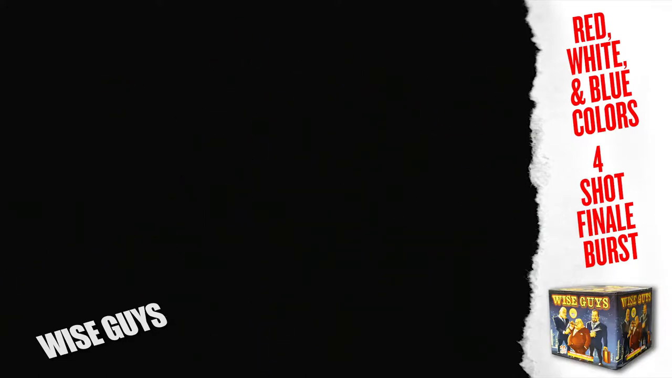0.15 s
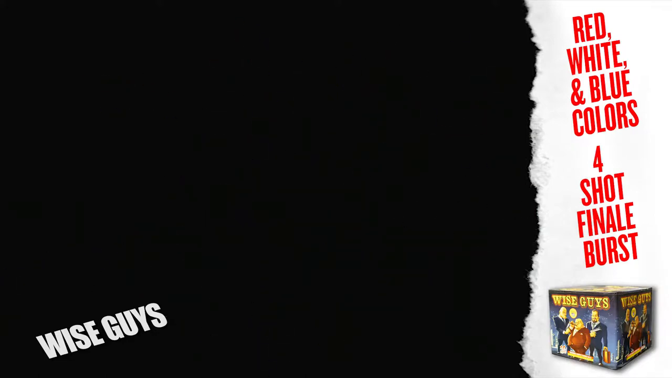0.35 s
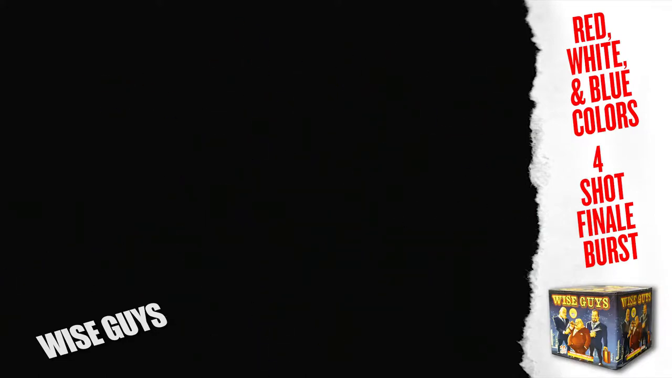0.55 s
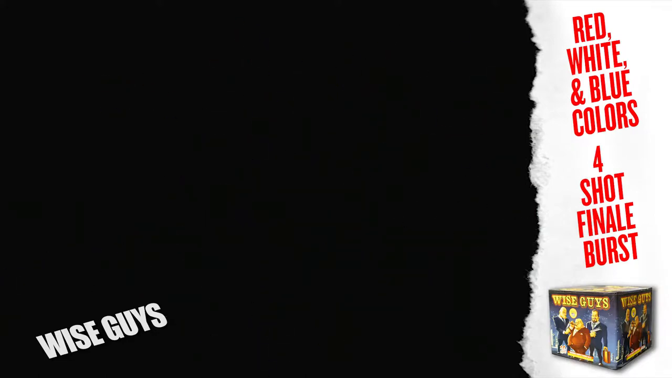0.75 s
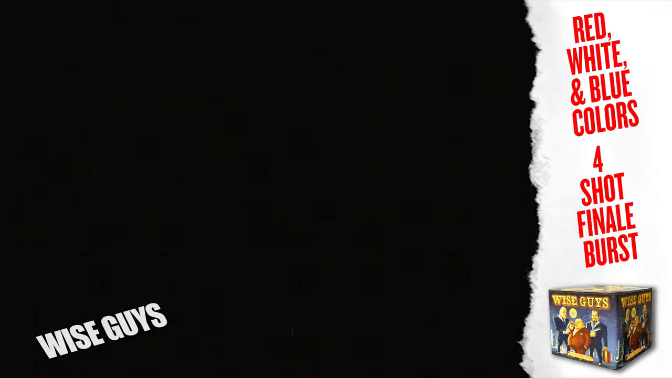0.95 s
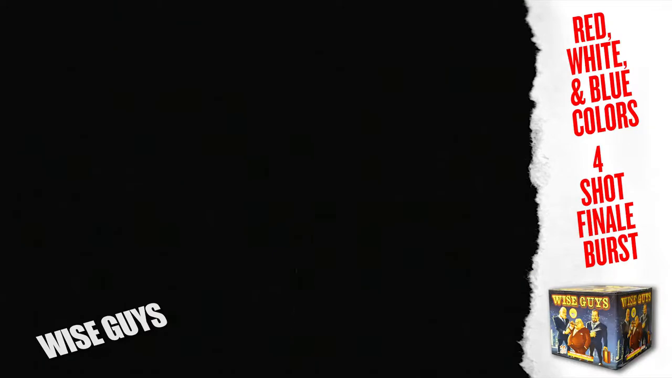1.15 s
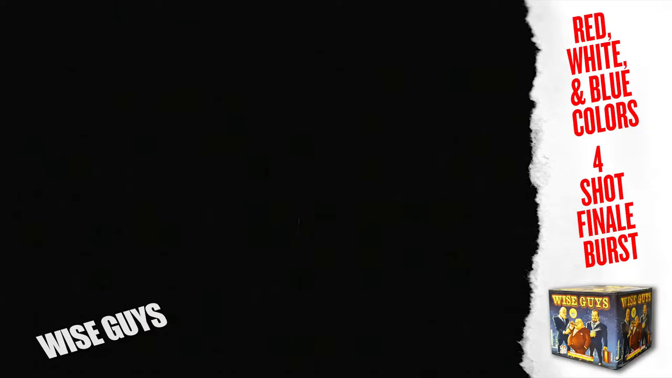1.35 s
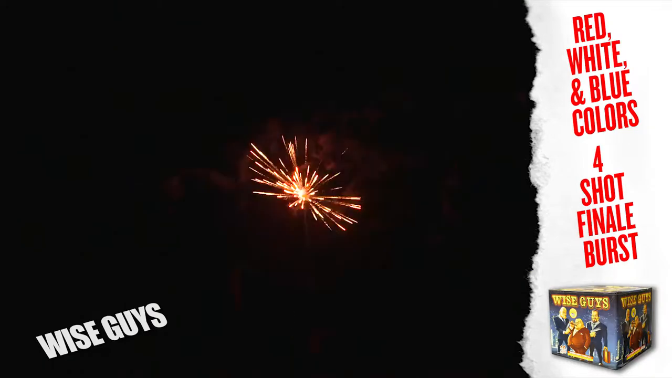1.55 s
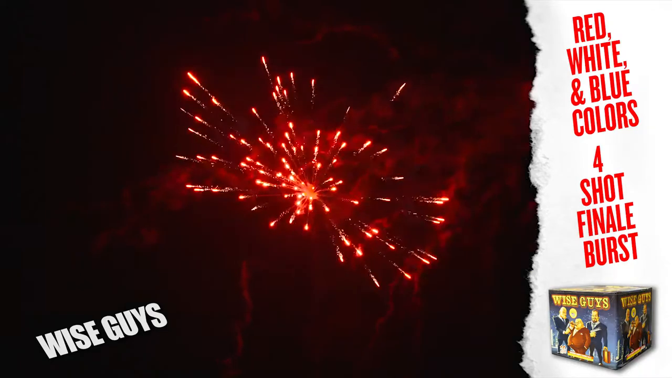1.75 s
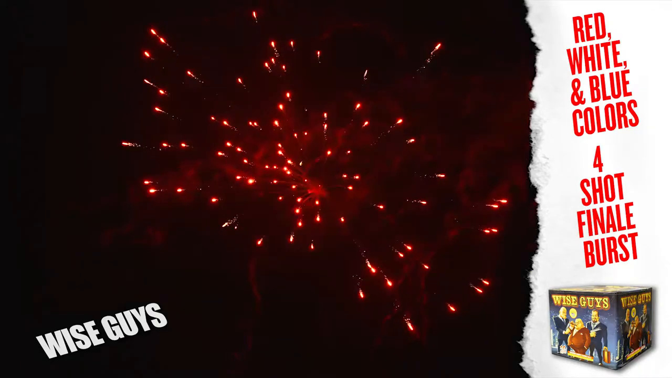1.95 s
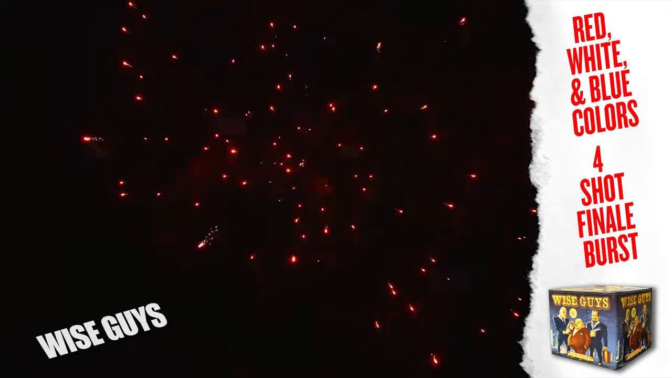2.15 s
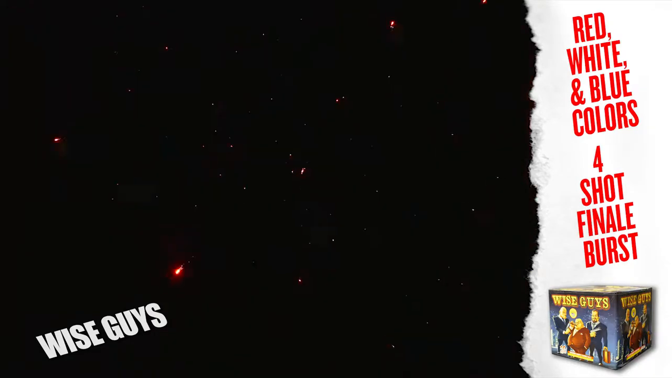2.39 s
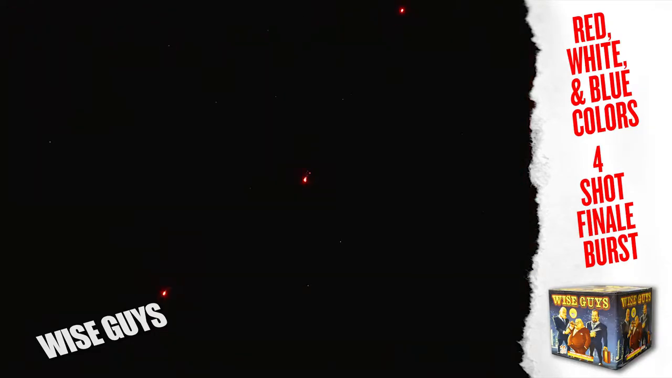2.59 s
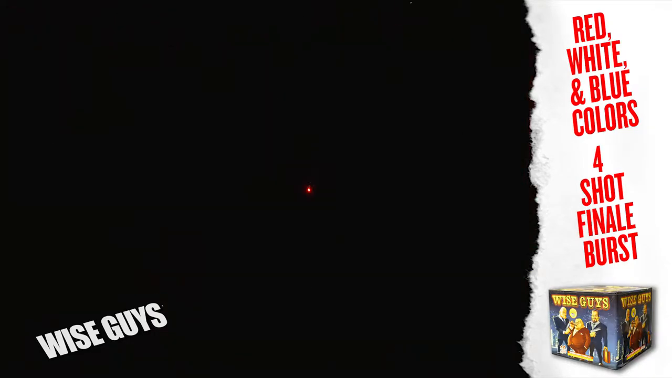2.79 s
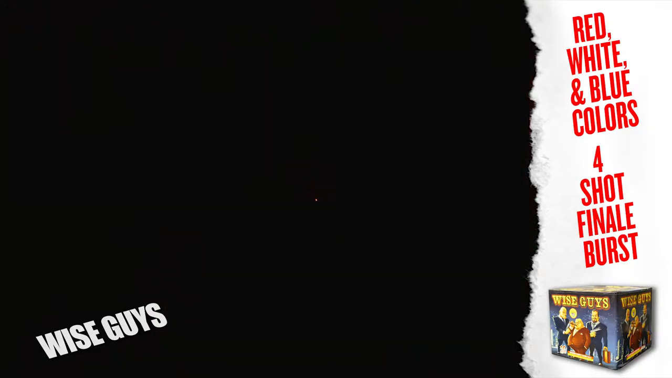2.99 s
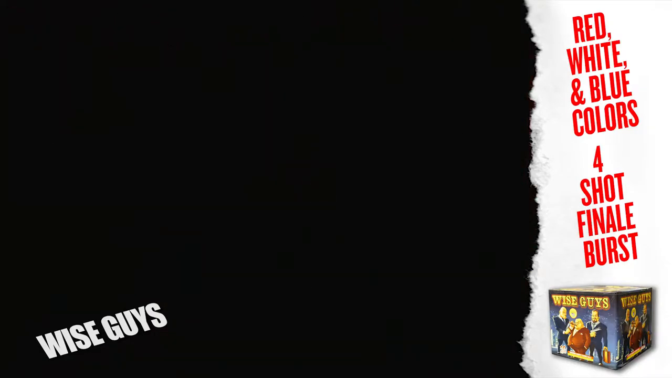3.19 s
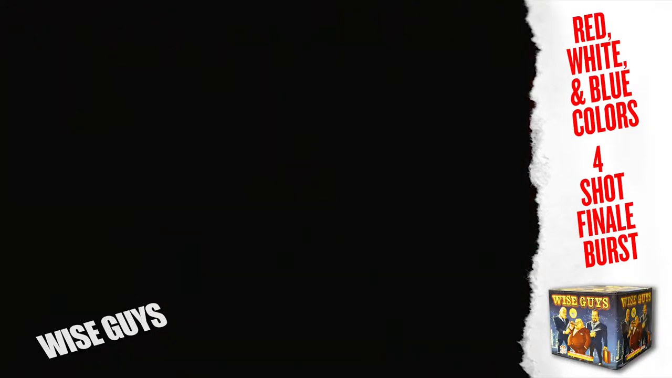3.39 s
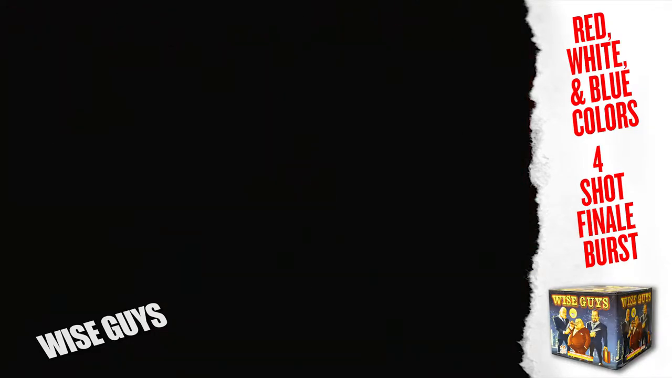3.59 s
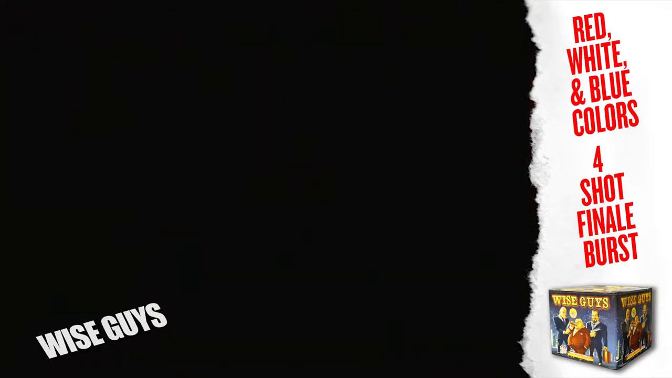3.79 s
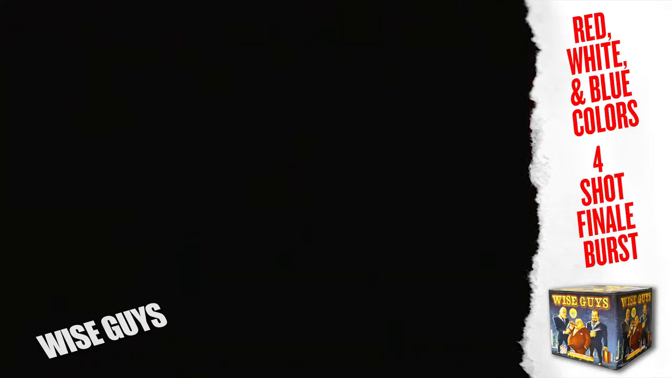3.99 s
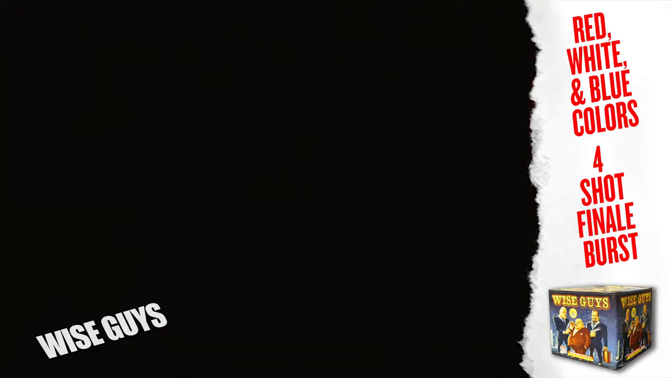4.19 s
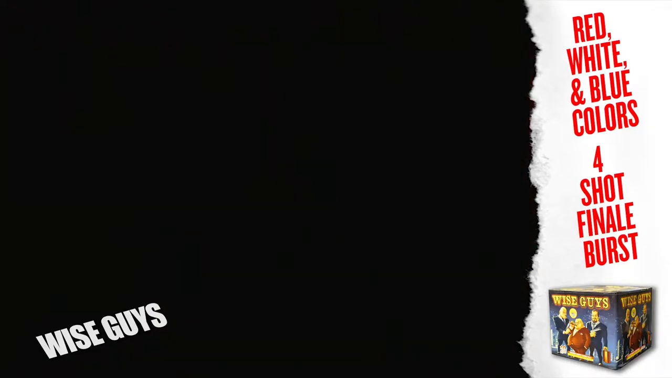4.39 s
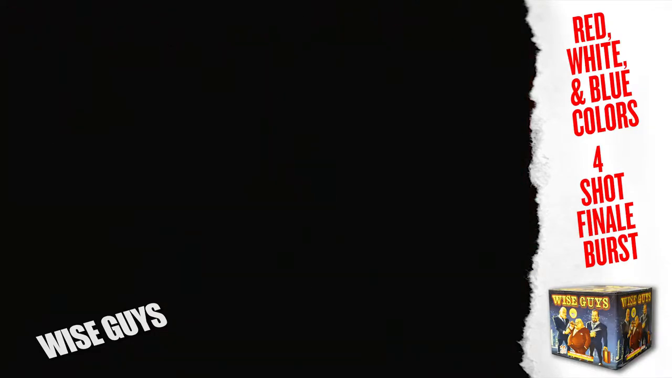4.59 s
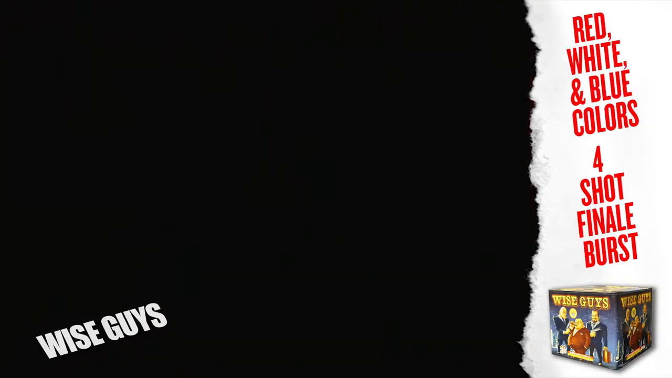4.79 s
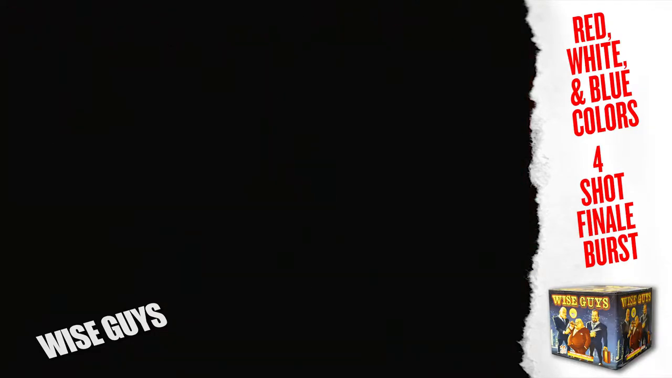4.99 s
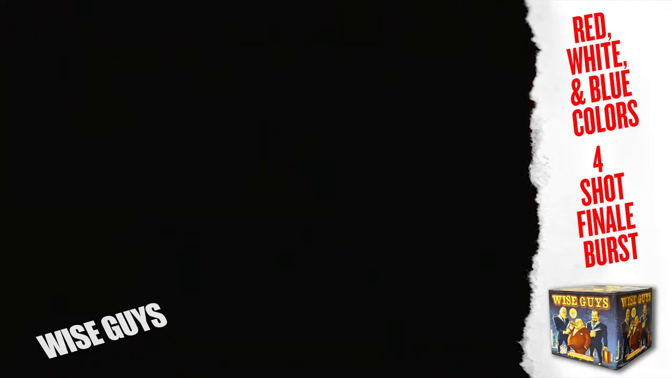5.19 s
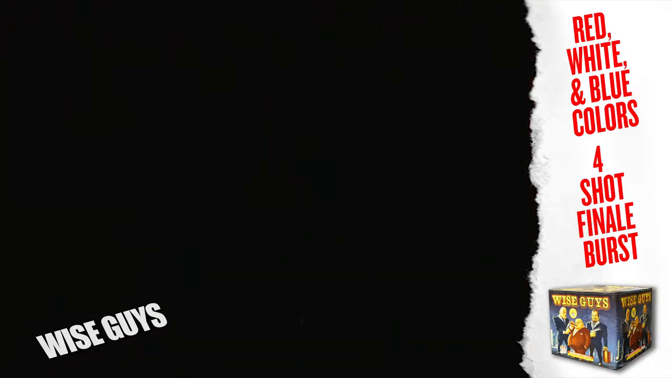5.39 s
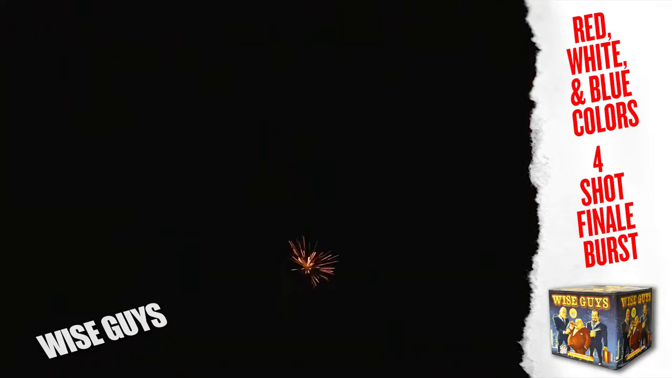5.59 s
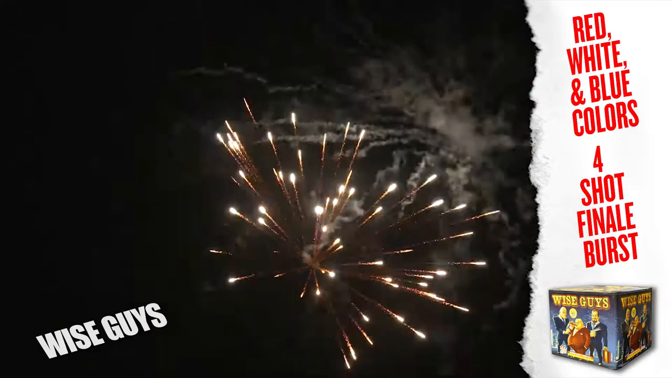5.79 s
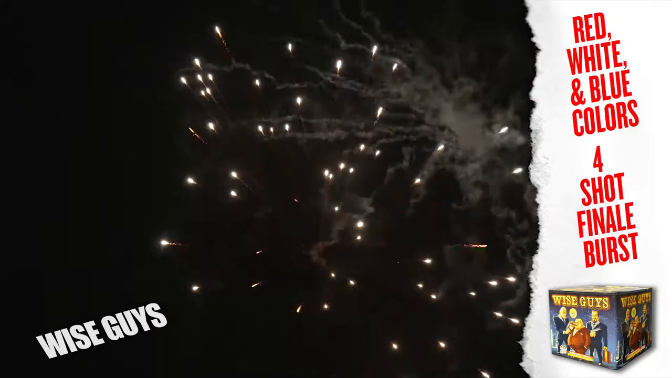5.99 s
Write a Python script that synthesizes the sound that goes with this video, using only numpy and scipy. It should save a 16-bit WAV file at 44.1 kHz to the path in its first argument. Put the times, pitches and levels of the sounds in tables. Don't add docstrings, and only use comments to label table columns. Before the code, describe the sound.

A quiet open place at night, with soft low wind buffeting the microphone, a faint steady hum and barely audible dry leaf rustle. At about 0.45 s a firework leaves its tube with a short hollow thump and crack, echoed quickly by walls, one return clearest near 0.6 s. A few tiny debris ticks follow. At 1.8 s the shell breaks overhead: a massive, abrupt bang, doubled by the ground and distorting the microphone, with slapping echoes to about 2.0 s. Trees scatter it into a dense, dulling roar while stars hiss thinly; a distant return comes near 2.75 s, then low far rolls fade until about 5 s. Small dry clicks gather from 4.2 to 4.85 s. At 4.87 s a second similar thump sounds, with sharper ticks around 5.0 and 5.2 s. At 5.9 s the second huge bang hits, its echoes still ringing at the end.

```python
import sys
import numpy as np
from scipy import signal
from scipy.fft import rfft, irfft, next_fast_len
from scipy.io import wavfile
from scipy.ndimage import uniform_filter1d

SR = 44100
rng = np.random.default_rng(int(sys.argv[2]) if len(sys.argv) > 2 else 0)


def invert_db(x):
    u = np.asarray(x, float) / 20
    return 10 ** u


def to_wav(sig):
    pcm = np.clip(np.atleast_2d(sig), -1, 1) * 32767
    pcm = np.round(pcm).astype(np.int16)
    wavfile.write(sys.argv[1], SR, pcm.T)


N = 266805
T = np.arange(N) / SR
M = next_fast_len(N, True)


def level(x):
    return x / np.sqrt(np.mean(x ** 2))


def band(x, lo_hz, hi_hz, order=2):
    sos = signal.butter(order, [lo_hz, min(hi_hz, .47 * SR)], "bandpass", fs=SR, output="sos")
    return signal.sosfilt(sos, x)


def walk(rate_hz):
    hold = int(SR / rate_hz)
    steps = np.repeat(rng.standard_normal(N // hold + 1), hold)
    return 1.3 * uniform_filter1d(uniform_filter1d(steps, hold), hold)[:N]


def colour(table, hz):
    f, db = np.transpose(table)
    return np.interp(np.log(np.maximum(hz, 1)), np.log(f), db)


def coloured_noise(table, lo_hz, hi_hz):
    f = np.fft.rfftfreq(M, 1 / SR)
    gain = invert_db(colour(table, f)) * (f > lo_hz) * (f < hi_hz)
    return level(irfft(rfft(rng.standard_normal(M)) * gain, M)[:N])


def swells(table, base_db):
    bells = sum(invert_db(db) ** 2 * np.exp(-((T - s) / half_s) ** 2) for s, db, half_s in table)
    return np.sqrt(invert_db(base_db) ** 2 + bells)


def add(out, s, wave):
    i = int(round(s * SR))
    out[i:i + len(wave)] += wave[:N - i]


def swing(hz, tau_ms, sudden=1.):
    t = T[:1500]
    return np.cos(2 * np.pi * hz * t) * np.exp(-(1000 * t / tau_ms) ** sudden)


# [t/s, peak level/dB, swing f/Hz, ground bounce delay/ms, bounce level/dB]
BREAKS = [
    (1.8068, -.9, 420, 5.05, -1.2),
    (5.9035, -1.3, 420, 4.5, -.8),
]
# [t/s, peak level/dB, centre f/Hz, polarity]
BREAK_ECHOES = [(1.8148, -11, 700, 1), (1.8218, -10, 600, -1), (1.8246, -9, 400, 1), (1.8276, -12, 380, 1),
                (1.855, -17, 500, 1), (1.871, -15, 1500, 1), (1.897, -19, 2400, 1), (1.942, -16, 400, 1),
                (1.976, -17, 450, 1), (2.038, -17, 200, 1), (2.755, -33, 600, 1), (5.9116, -11, 350, 1),
                (5.9195, -13, 450, 1), (5.9253, -11, 800, -1), (5.931, -12, 500, 1), (5.958, -13, 1500, -1),
                (5.9597, -11, 900, -1), (5.9645, -14, 500, 1)]


def breaks():
    out = np.zeros(N)
    for s, db, hz, bounce_ms, bounce_db in BREAKS:
        turbulence = 1 + .07 * rng.standard_normal(1500)
        bounce = swing(.88 * hz, 2.1, 4.) * turbulence
        add(out, s, invert_db(db) * swing(hz, 2., 4.) * turbulence)
        add(out, s + bounce_ms / 1000, invert_db(db + bounce_db) * bounce)
    for s, db, hz, sign in BREAK_ECHOES:
        echo = band(swing(hz, tau_ms=300 / hz), hz / 4, hz * 2.5)
        add(out, s, sign * invert_db(db - 1.5) * echo / np.abs(echo).max())
    return out


# [t/s, peak level/dB, tube ring f/Hz, ground bounce delay/ms, igniting puff level/dB]
LIFTS = [
    (.4503, -8.5, 205, .4, -29),
    (4.8696, -8.5, 195, .41, -42),
]
# [t after it/ms, level/dB, polarity]
LIFT_ECHOES = [(8.5, -15, 1), (13, -12, 1), (18, -13, 1), (22.3, -12, 1), (29.5, -16, 1), (34, -17.5, 1),
               (45, -22, 1), (57, -17.5, 1), (104, -21, -1), (118, -23, 1), (123, -21, 1), (128, -22, 1),
               (163, -26, 1), (174, -15.5, 1), (196, -26, -1)]


def lifts():
    out, t = np.zeros(N), T[:1500]
    crack = signal.lfilter([.26, .48, .26], 1, np.exp(-t / .0002))
    ground_crack = signal.lfilter(np.ones(4) / 4, 1, crack)
    for s, db, hz, bounce_ms, puff_db in LIFTS:
        ring = (swing(hz, 6., 2.5) - .45 * swing(2.75 * hz, 4.)) * (1 - np.exp(-t / .0003))
        add(out, s, invert_db(db) * (1.5 * crack + .65 * ring))
        add(out, s + bounce_ms / 1000, invert_db(db) * (.95 * ground_crack + .65 * ring))
        fizz = level(band(rng.standard_normal(1500), 1500, 4200))
        puff = np.sin(2 * np.pi * hz * t) + 0.31 * fizz
        add(out, s - .0055, invert_db(puff_db) * puff * np.exp(-((t - .004) / .004) ** 2))
        worn = np.cos(2 * np.pi * 1.1 * hz * (t - .006)) * np.exp(-((t - .006) / .0026) ** 2)
        for ms, echo_db, sign in LIFT_ECHOES:
            add(out, s + (ms - 6) / 1000, sign * invert_db(db + echo_db) * worn)
    return out


SWELL, SWELL_DB = .35, 5


def scatter(shots, stands, spectrum, bass_late_s, bass_hold_db_s, air_db_s, patchy_db, grain_db, air, own_db):
    f = np.fft.rfftfreq(M, 1 / SR)
    grains = rng.standard_normal(N) * invert_db(grain_db * walk(400))
    dense = rfft(grains, M) * invert_db(colour(spectrum, f))

    def power_db(lo_hz, hi_hz):
        inside = (f >= lo_hz) & (f < hi_hz)
        return 10 * np.log10(np.sum(np.abs(dense[inside]) ** 2) * 2 / M ** 2)

    mid0, bass0, treble0 = power_db(600, 2500), power_db(100, 400), power_db(4000, 8000)
    out, patches = np.zeros(N), 0.19 * patchy_db * walk(60)
    octave, coarse = np.log2(np.maximum(f, 1)), T[::32]
    for hz in 50 * 2 ** (np.arange(26) / 3):
        part = irfft(dense * np.clip(1 - 3 * np.abs(octave - np.log2(hz)), 0, 1), M)[:N]
        low = np.clip(np.log2(700 / hz), 0, 1)
        high = max((hz - 1500) / 4000, 0) ** air
        own = own_db * (0.13 + 0.73 * low) * walk(min(hz / 12, 40))
        energy = 0
        for shot, *_ in shots:
            after = np.maximum(coarse - shot, 0)
            onset = np.minimum(after / (0.0033 + low * bass_late_s), 1)
            for arrives, mid, fade_db_s, bass, treble in stands:
                bass_db = low * (bass - bass0 + mid0 + bass_hold_db_s * after)
                treble_db = high * (treble - treble0 + mid0 + air_db_s * after)
                fade_db = fade_db_s * np.maximum(after - arrives, 0)
                swell_s = max(min(SWELL * arrives, -SWELL_DB / fade_db_s), .011)
                rise = np.clip(1 + (after - arrives) / swell_s, 0, 1) * onset
                energy = energy + (rise * invert_db(mid - mid0 + bass_db + treble_db + fade_db)) ** 2
        out += part * np.interp(T, coarse, np.sqrt(energy)) * invert_db(patches + own)
    return out


# [t after it/s, middle level/dB, fade/dB per s,
#                         bass minus middle level/dB, treble minus middle level/dB]
BREAK_STANDS = [
    (.011, -25.5, -350, 6.5, -9.5),
    (0.043, -28.5, -110, 7, -9.5),
    (.15, -29, -55.5, -10.5, -16.5),
    (.33, -37.5, -22, -7.5, -16),
    (.94, -49, -250, -5, -28),
    (1.145, -60.5, -250, 5, -14),
]
# [f/Hz, level/dB per Hz]
BREAK_COLOUR = [(29, -53.5), (50, -21), (195, 0), (455, -6), (552, -5.5), (639, -5.5), (1090, -9.5),
                (1170, -10.5), (1860, -12.5), (5670, -33), (9910, -48), (14300, -64.5), (16500, -81)]


def break_tail():
    return scatter(BREAKS, BREAK_STANDS, BREAK_COLOUR, bass_late_s=0.01, bass_hold_db_s=7.5,
                   air_db_s=-0.8, patchy_db=0.7, grain_db=1.0, air=0.44, own_db=-0.5)


FAR_STANDS = [
    (1.301, -59.5, -8, -1.5, -22.5),
    (2.882, -65, -23, -1.8, -39),
]
# [f/Hz, level/dB per Hz]
FAR_COLOUR = [(29, -44), (50, -16), (98, -16.5), (136, 5), (234, 0), (324, -9), (678, -2.5), (843, -19.5),
              (1000, 3), (1520, -5), (2150, -14), (2440, -18), (2910, -18.5), (4790, -43.5), (9000, -56),
              (11700, -65), (19800, -120)]


def far_tail():
    return scatter(BREAKS, FAR_STANDS, FAR_COLOUR, bass_late_s=.03, bass_hold_db_s=0.57,
                   air_db_s=-2.0, patchy_db=3.5, grain_db=-0.5, air=0.17, own_db=4.2)


LIFT_STANDS = [
    (.017, -38.5, -380, 10, -8.5),
    (.045, -48.5, -110, 11, -10.5),
    (.155, -47.5, -110, 1, -23),
    (.27, -57.5, -33, 2, -26.5),
]
# [f/Hz, level/dB per Hz]
LIFT_COLOUR = [(29, -55), (50, -26.5), (114, -4.5), (184, 2), (337, -11), (362, -15.5), (520, -19),
               (559, -17), (615, -23), (1180, -23.5), (2680, -26), (8540, -53.5), (16000, -87.5)]


def lift_tail():
    return scatter(LIFTS, LIFT_STANDS, LIFT_COLOUR, bass_late_s=0.036, bass_hold_db_s=8.5,
                   air_db_s=-0.5, patchy_db=-0.7, grain_db=2.0, air=0.37, own_db=3.5)


def stars():
    swell_s, burn_s, die_db_s = .45, 0.77, -40
    hiss = level(band(rng.standard_normal(N), 6500, 12500, order=1)) * invert_db(2.6 * walk(15))
    burn = np.zeros(N)
    for s, *_ in BREAKS:
        t = T - s
        burn += np.clip(t / swell_s, 0, 1) * invert_db(die_db_s * np.clip(t - burn_s, 0, None))
    return invert_db(-74) * hiss * burn


# [t/s, peak level/dB, centre f/Hz, width/octaves]
TICKS = [(.730, -51, 2500, 1.8), (.637, -48, 3330, 0.82), (.766, -42.5, 1380, 0.52),
         (1.3295, -47.5, 4430, 1.1), (1.7507, -53, 2600, 0.66), (1.751, -51.5, 6470, 0.91),
         (4.435, -49.5, 1400, 2), (4.19, -56.5, 5580, 1.2), (4.413, -62, 4900, 1), (4.508, -61, 5500, 1.6),
         (4.523, -63, 6000, 0.76), (4.535, -57, 4430, .3), (4.5675, -40, 980, 1.85),
         (4.585, -57.5, 5300, 2.5), (4.588, -50, 500, 1.5), (4.634, -52, 900, 0.82),
         (4.658, -51, 1200, 1.5), (4.712, -48, 1000, 1.5), (4.727, -47, 1480, 1.4), (4.765, -49, 1190, 1),
         (4.840, -45.5, 900, 2), (5.018, -32, 1500, 0.49), (5.057, -48, 3300, .4), (5.147, -59, 3000, 2),
         (5.186, -38, 1870, 0.7), (5.599, -57, 2200, 1.5), (5.795, -46, 1200, 1.3), (5.04, -51.5, 6060, .3),
         (.257, -53, 800, 1.2), (.38, -56, 536, 0.77)]


def ticks():
    out, t = np.zeros(N), T[:600]
    for s, db, hz, wide in TICKS:
        grit = rng.standard_normal(600)
        knock = (1 + .5 * grit) * np.exp(-t * hz)
        crumble = 0.16 * grit * np.exp(-t / 0.0034)
        click = band(knock + crumble, hz / 2 ** (wide / 2), hz * 2 ** (wide / 2))
        add(out, s, invert_db(db) * click / np.abs(click).max())
    return out


# [t/s, peak level/dB, half length/s]
GUSTS = [
    (.12, -47, 0.17),
    (.4, -45, 0.08),
    (.8, -53, 0.14),
    (1.68, -53, 0.23),
    (2.1, -57, 0.48),
    (2.9, -48, 0.063),
    (3.42, -54, .05),
    (3.6, -57, .12),
    (5.9, -63.5, 0.34),
]
# [f/Hz, level/dB per Hz]
WIND_COLOUR = [(3, 4), (12, 0.5), (27, -1), (46, -10), (80, -20), (130, -27.5), (250, -42.5), (500, -61),
               (900, -81.5)]


def wind():
    rumble = coloured_noise(WIND_COLOUR, 3, 900) * invert_db(2.8 * walk(7))
    breeze_db = -54.5 - 2 * T
    return rumble * swells(GUSTS, breeze_db) * invert_db(2.5)


# [t/s, peak level/dB, half length/s]
RUSTLES = [
    (.001, -72, 0.064),
    (1.1, -74, .07),
    (1.3, -77.5, 0.57),
    (4.4, -84.5, .12),
    (5.4, -75.5, 0.032),
    (5.4, -77.5, 0.54),
]


def rustles():
    grains = level(band(rng.standard_normal(N) * invert_db(2 * walk(110)), 3400, 6600))
    return grains * swells(RUSTLES, base_db=-92.5)


# [f/Hz, level/dB per Hz]
NIGHT_COLOUR = [(100, -20), (200, -22.5), (400, -31.5), (1000, -28.5), (1700, -36), (2400, -42),
                (2950, -36), (3600, -51.5), (9000, -53.5), (12000, -52.5), (15000, -55)]


def night():
    return coloured_noise(NIGHT_COLOUR, 90, 15800) * invert_db(-67.5 + 1.7 * walk(3))


def scene():
    tails = lift_tail() + break_tail() + far_tail()
    shots = lifts() + breaks()
    return (shots + tails + stars() + ticks() + night() + wind() + rustles())[None]


def thin_top(x):
    f, _, z = signal.stft(x, SR, window="cosine", nperseg=2048)
    for k, lo_hz in enumerate(np.arange(12000, 17000, 625)):
        rows = (f >= lo_hz) & (f < lo_hz + 625)
        db = 10 * np.log10(np.mean(np.abs(z[0, rows]) ** 2, axis=0) + 1e-20)
        edge_db = -114.5 + .5 * k + 22 * (lo_hz > 15700)
        chance_db = 3 * rng.standard_normal(len(db))
        z[0, rows] *= np.where(db + chance_db > edge_db, 1, .15)
    return signal.istft(z, SR, window="cosine", nperseg=2048)[1][:, :N]


def low_pass(x):
    return signal.sosfilt(signal.butter(12, 17120, fs=SR, output="sos"), x)


def record(dry):
    drift, shaken, t = np.zeros(N), np.zeros(N), T[:24000]
    for s, *_ in BREAKS:
        recovery = .3 * np.exp(-t / .0065) + .06 * np.exp(-t / .08)
        add(drift, s + .0017, (1 - np.exp(-t / .0012)) * recovery)
        add(shaken, s, np.ones(255))
    drift = signal.lfilter(*signal.butter(1, 1.2, "highpass", fs=SR), drift)
    over = ((dry > .52) | (dry < -.73)) & (shaken > 0)
    lost = over & np.roll(over, 2, axis=1)
    chatter = .3 * drift + .12 * rng.standard_normal(N)
    x = np.where(lost, chatter, np.clip(dry + drift, -.39, .62))
    x = signal.sosfiltfilt(signal.ellip(6, .2, 40, 16600, fs=SR, output="sos"), x)
    mix = thin_top(x)
    return low_pass(mix)


dry = scene()
out = record(dry)
to_wav(out)
```